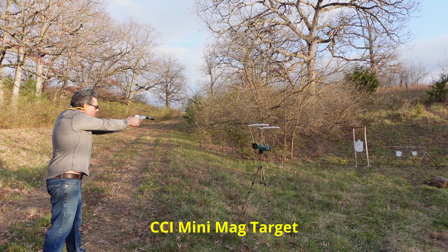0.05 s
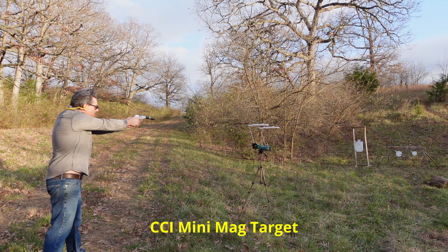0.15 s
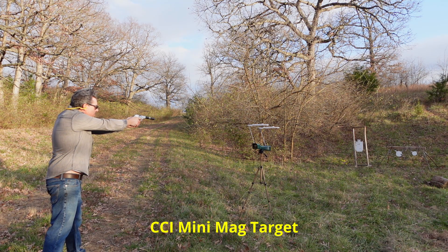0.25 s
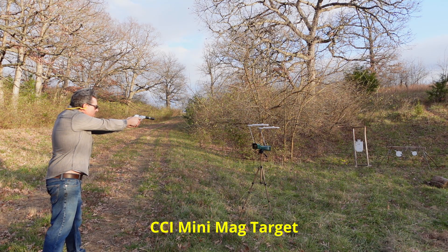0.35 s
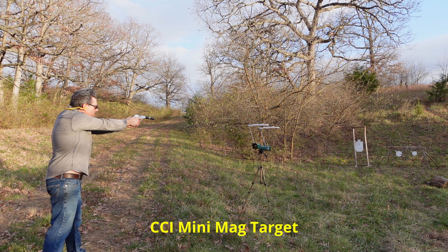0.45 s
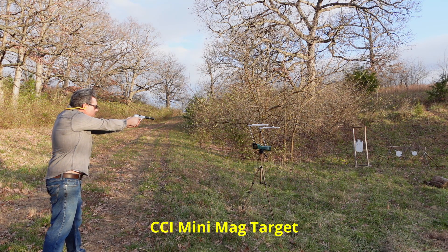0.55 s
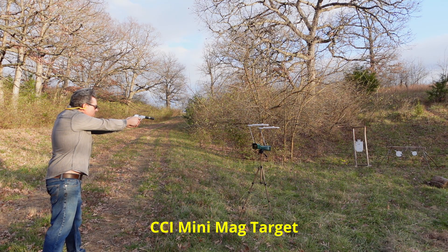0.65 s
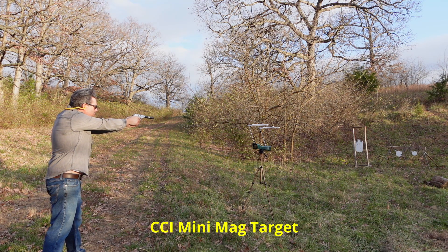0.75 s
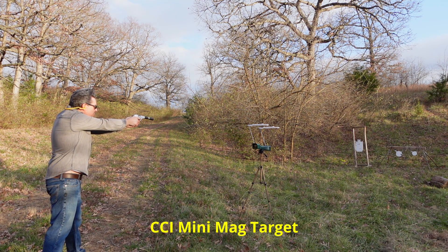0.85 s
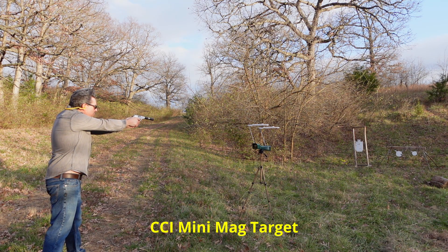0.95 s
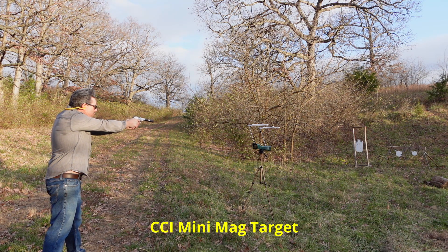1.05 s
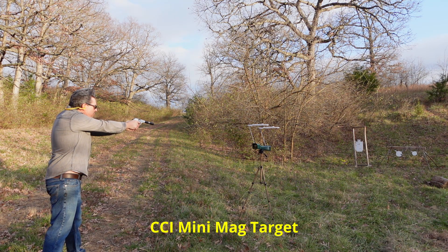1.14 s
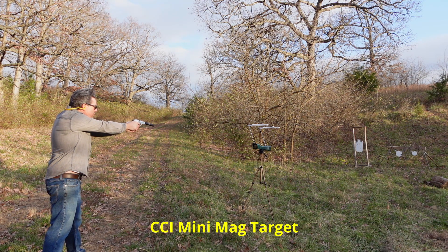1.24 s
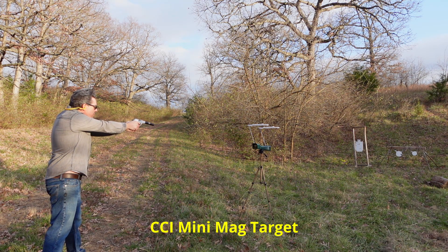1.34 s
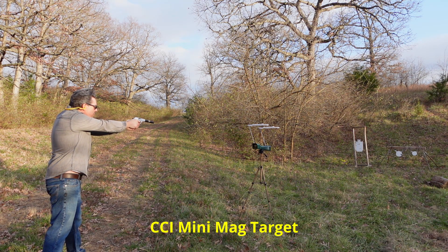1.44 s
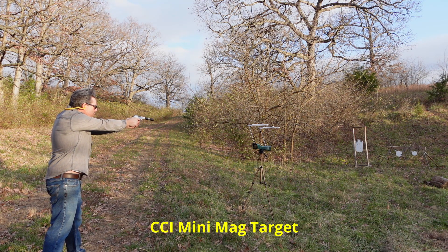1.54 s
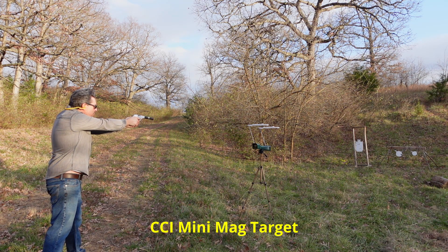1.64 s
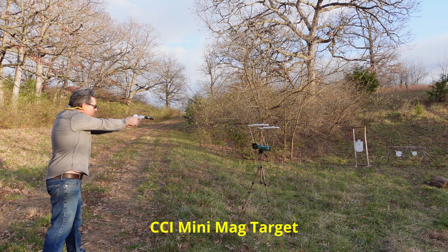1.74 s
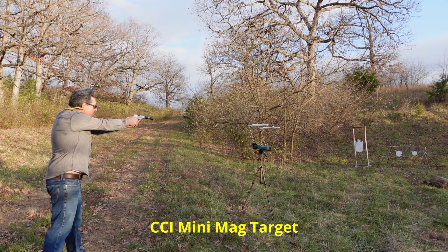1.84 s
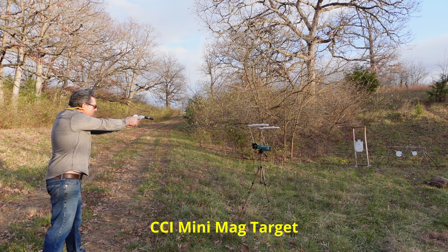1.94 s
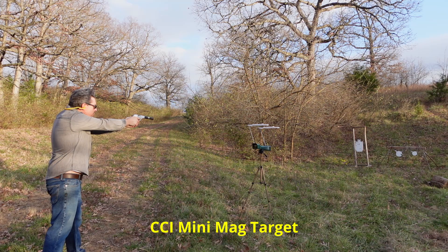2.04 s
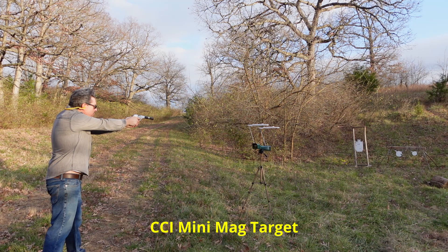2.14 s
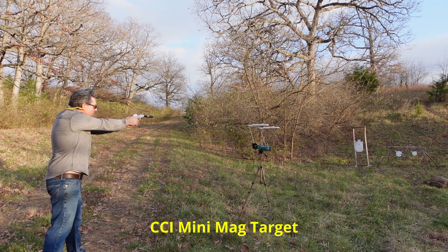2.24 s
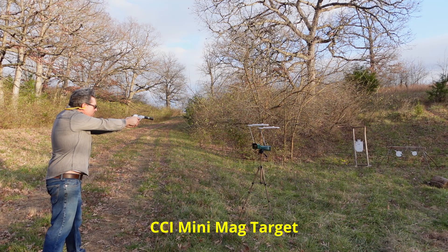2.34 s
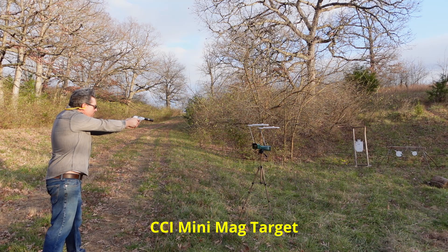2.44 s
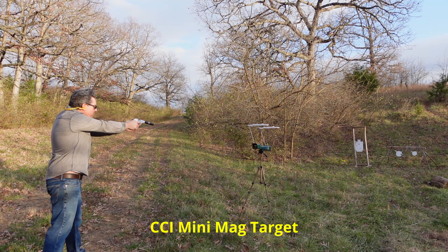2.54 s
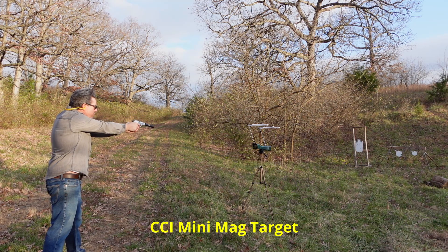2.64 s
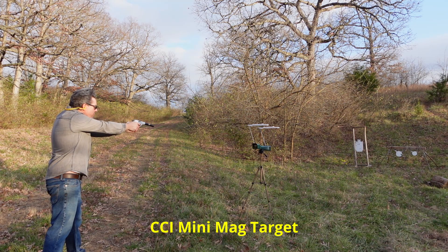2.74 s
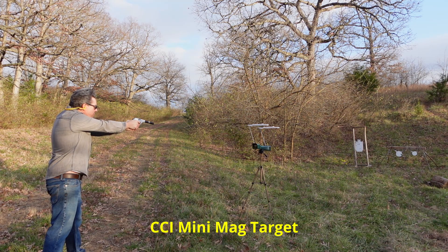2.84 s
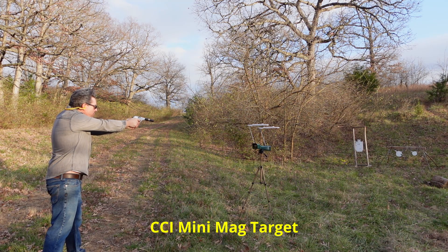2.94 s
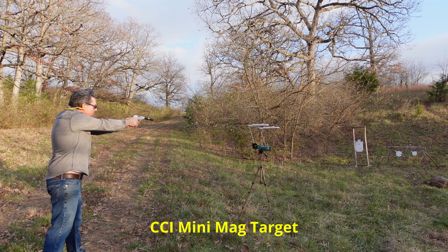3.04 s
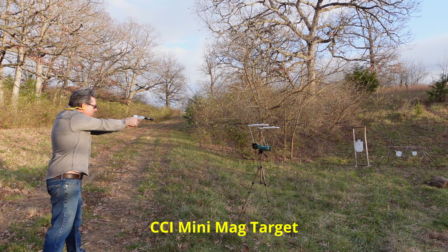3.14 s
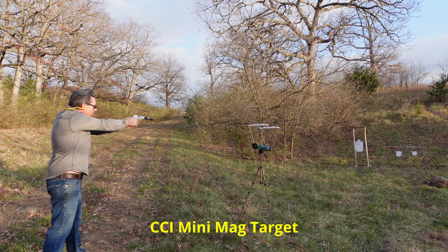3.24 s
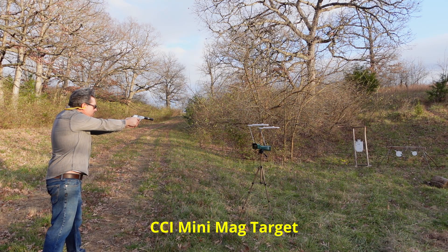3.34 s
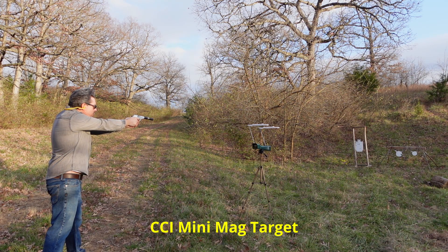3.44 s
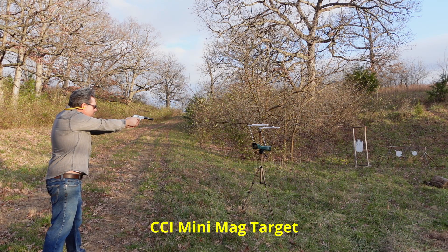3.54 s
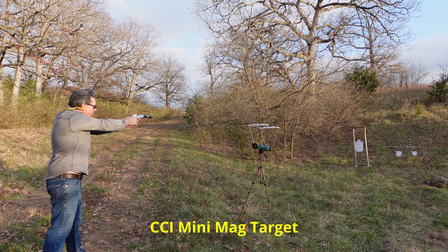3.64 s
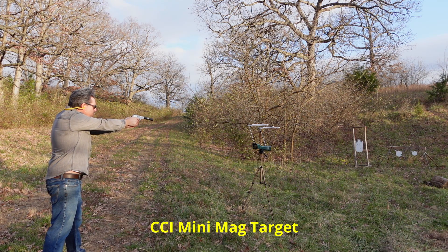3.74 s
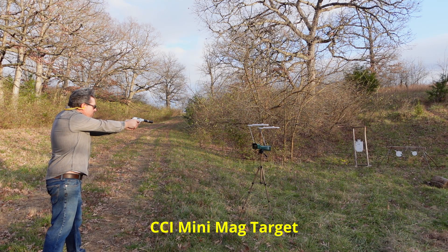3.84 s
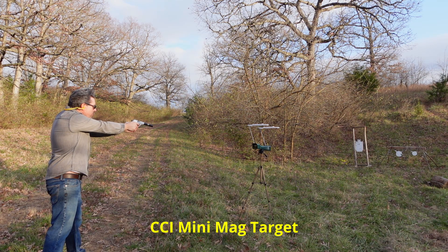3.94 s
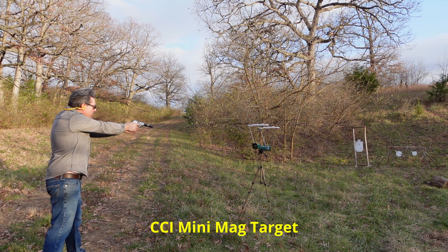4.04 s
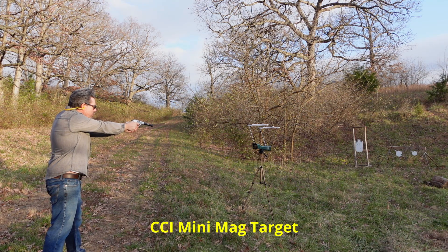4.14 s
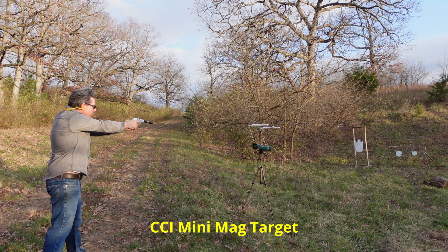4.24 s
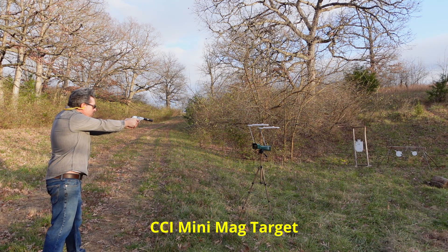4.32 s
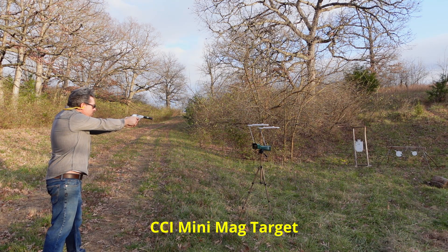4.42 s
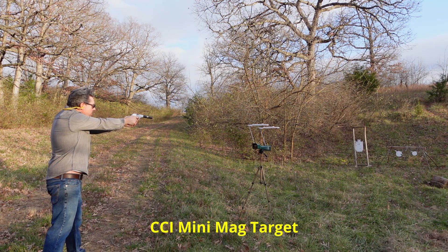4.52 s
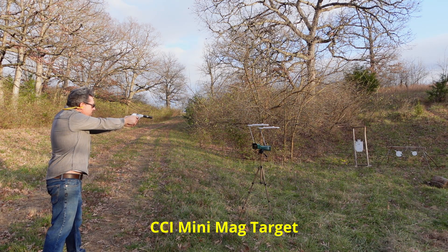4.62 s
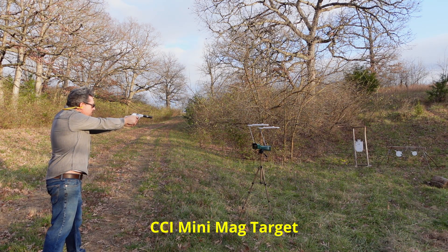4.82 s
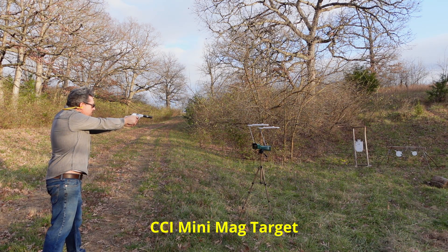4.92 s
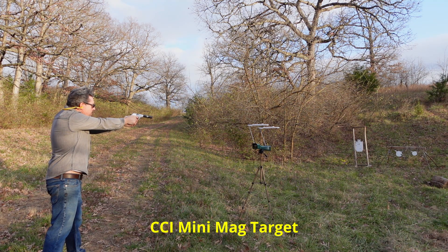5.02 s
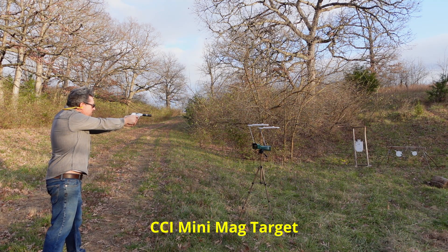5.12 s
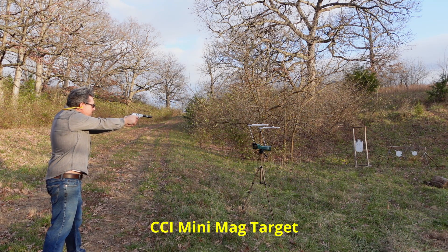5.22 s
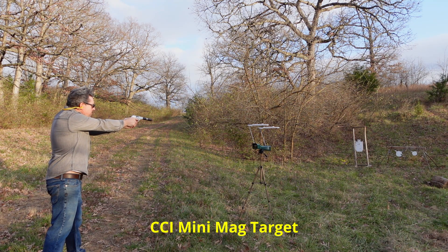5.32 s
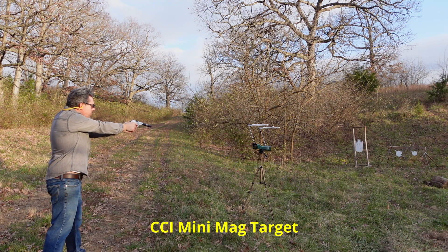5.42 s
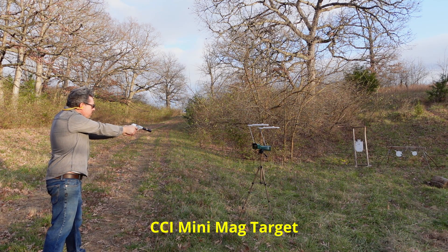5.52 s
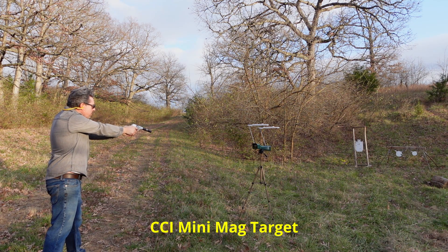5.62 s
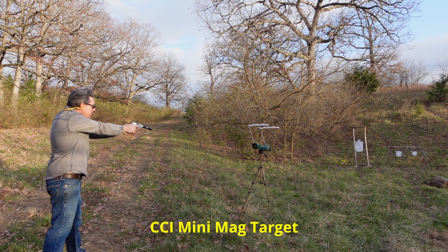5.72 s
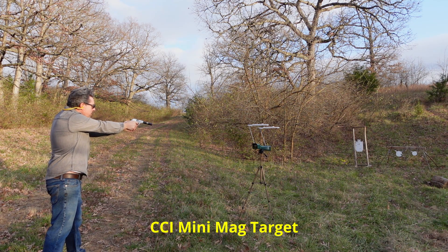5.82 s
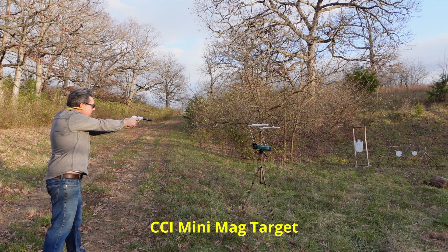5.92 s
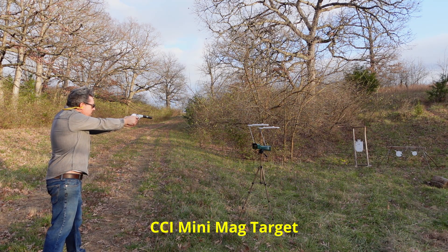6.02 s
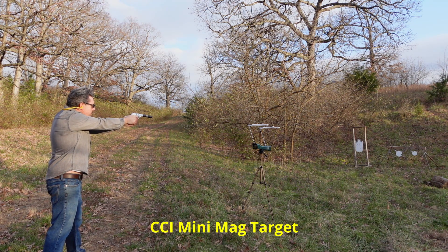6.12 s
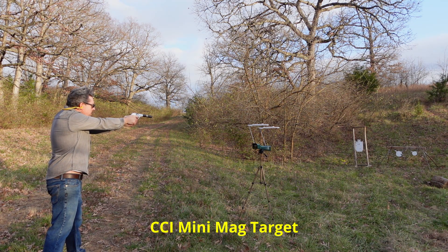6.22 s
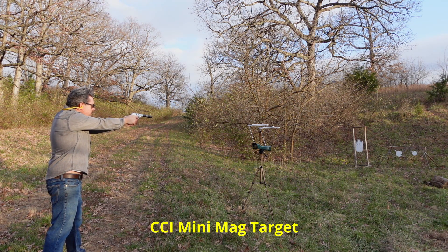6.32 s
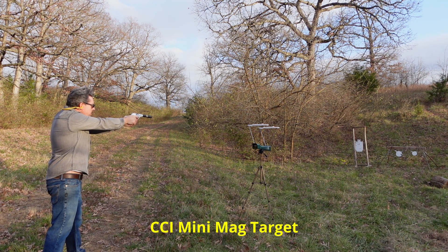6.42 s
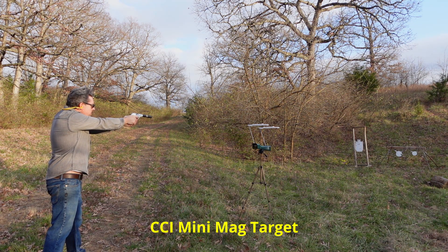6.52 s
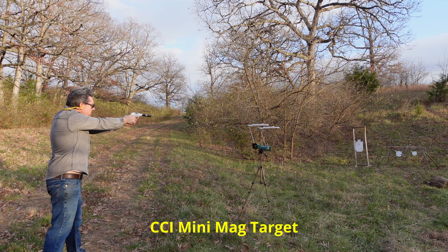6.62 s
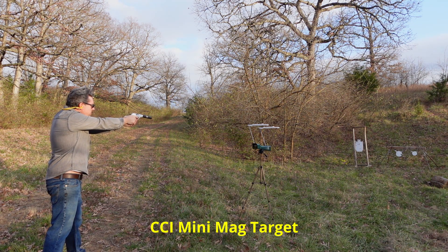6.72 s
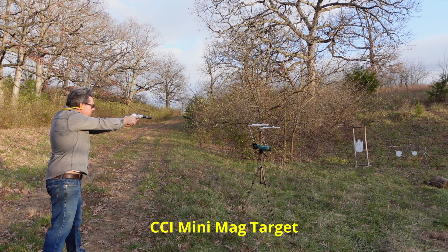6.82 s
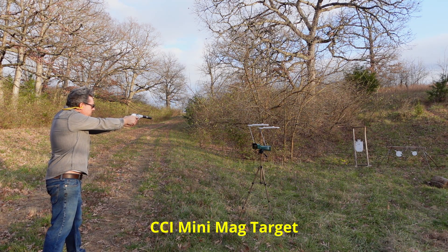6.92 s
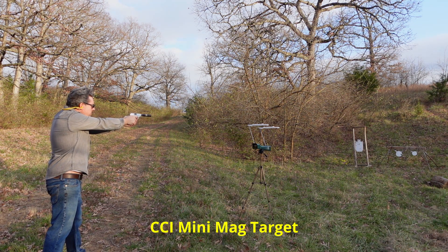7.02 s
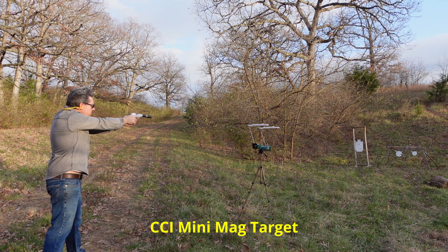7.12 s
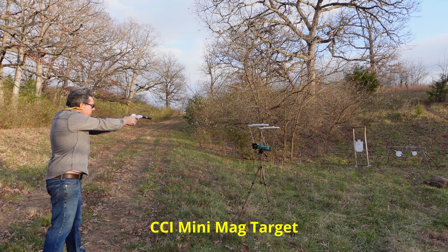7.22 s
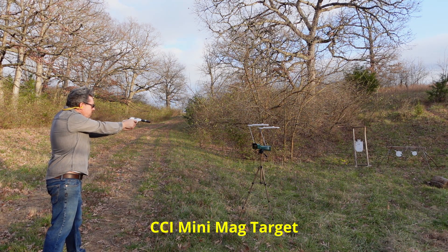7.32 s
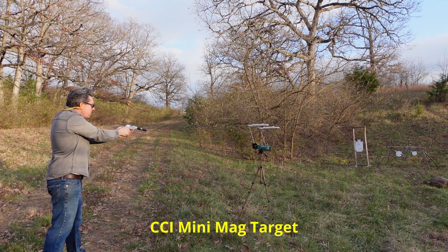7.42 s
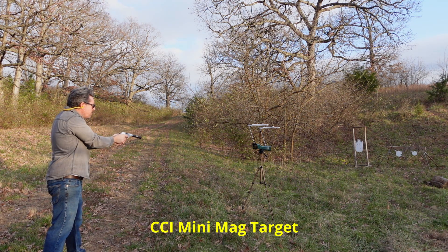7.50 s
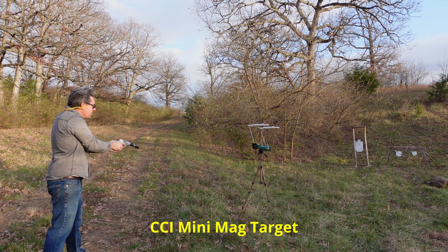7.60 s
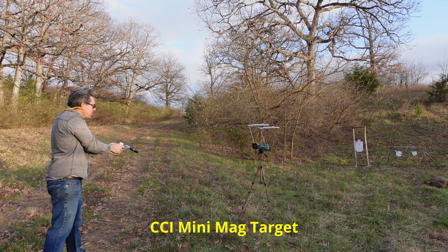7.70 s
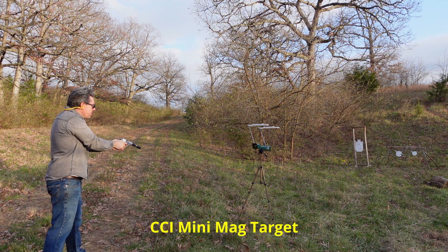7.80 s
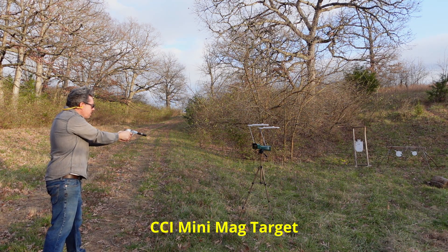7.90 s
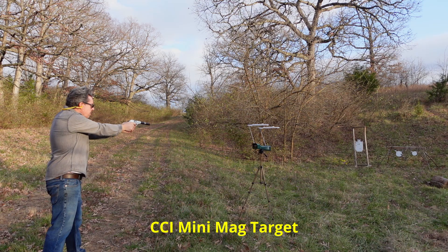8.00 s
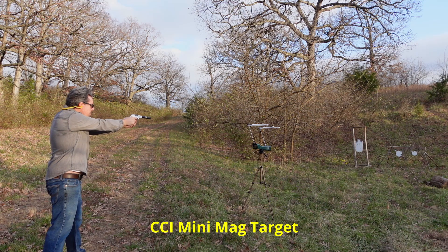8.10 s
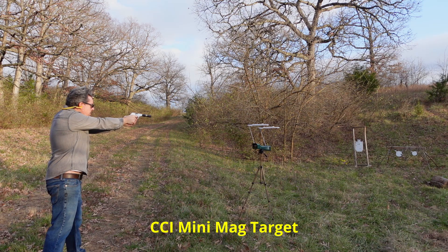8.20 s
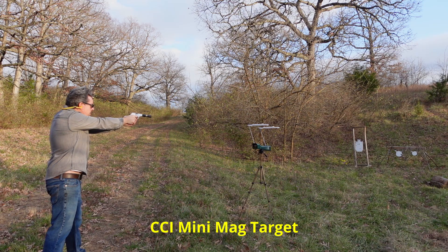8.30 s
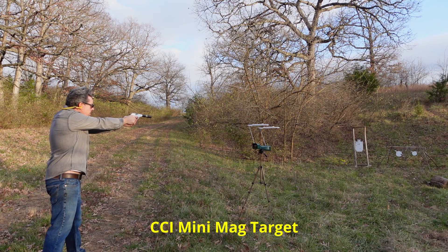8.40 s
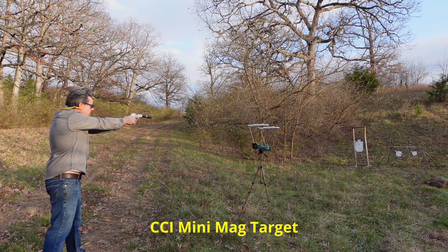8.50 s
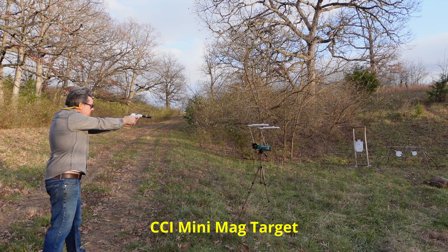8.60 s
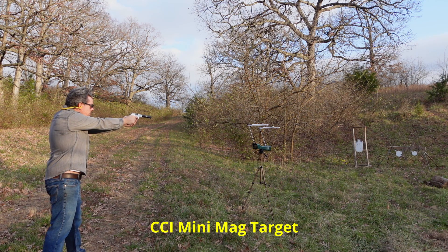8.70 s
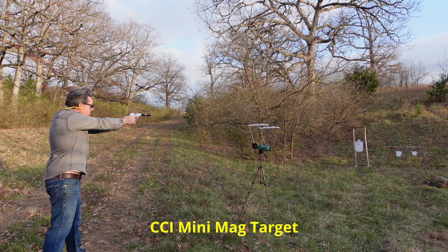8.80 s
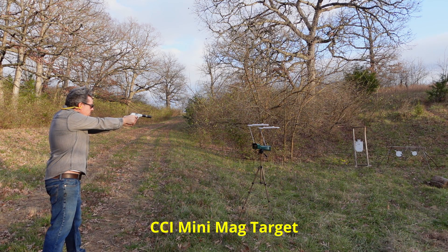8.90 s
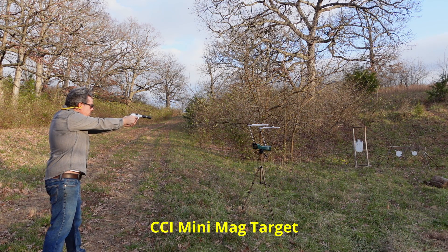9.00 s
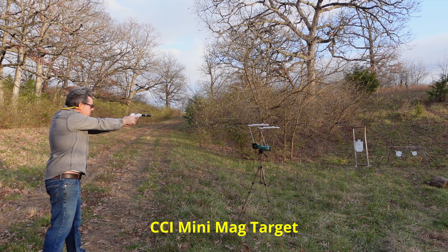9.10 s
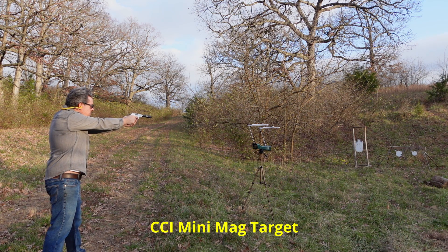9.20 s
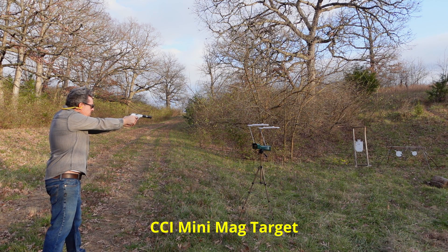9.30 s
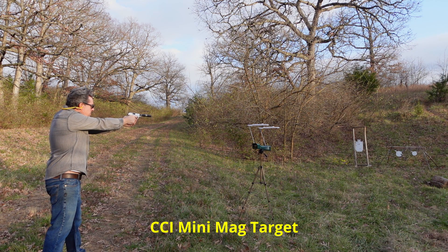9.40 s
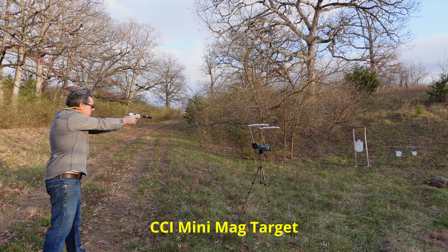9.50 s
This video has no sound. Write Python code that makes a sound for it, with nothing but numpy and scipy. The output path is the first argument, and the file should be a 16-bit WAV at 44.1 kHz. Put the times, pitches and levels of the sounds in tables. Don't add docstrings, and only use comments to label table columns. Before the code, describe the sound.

Quiet open air with distant bird whistles and low wind, then nine loud, thin pistol cracks. They come about every one and a half seconds, then a quick pair, a pause, and a fast run of three. A bullet strike clicks or knocks just after each, and brush and trunks return a short dulling echo. Between shots, tiny debris ticks, cases land in grass, and a camera motor purrs faintly. Mono, close microphone, blasts slightly rounded off.

```python
import sys
import numpy as np
from scipy import signal
from scipy.fft import rfft, irfft, next_fast_len
from scipy.io import wavfile
from scipy.ndimage import uniform_filter1d, map_coordinates

SR = 44100
rng = np.random.default_rng(int(sys.argv[2]) if len(sys.argv) > 2 else 0)


def unload_wav(signal):
    wavfile.write(
        sys.argv[1],
        SR,
        np.round(np.clip(np.atleast_2d(signal).T, -1, 1) * 32767).astype(np.int16),
    )


def boost_factor(decibels):
    exponent = np.asarray(decibels, float) / 20
    return 10 ** exponent


N = 421155
TAIL = 70000


def unit(x):
    return x / np.sqrt(np.mean(x ** 2) + 1e-20)


def along(points, hz):
    f, v = np.transpose(points)
    return np.interp(np.log(hz + 1), np.log(f + 1), v)


def wobble(rate, size=N):
    return map_coordinates(rng.standard_normal(size // 50), [np.arange(size) * rate / SR])


def filtered(x, response):
    m = next_fast_len(len(x) + 2048)
    return irfft(rfft(x, m) * response(np.fft.rfftfreq(m, 1 / SR)), m)[:len(x)]


def noise(spectrum, size=N):
    return unit(filtered(rng.standard_normal(size), lambda hz: boost_factor(along(spectrum, hz))))


def peak(hz, centre_hz, width_hz):
    return 1j * hz * width_hz / (centre_hz ** 2 - hz ** 2 + 1j * hz * width_hz)


def add(track, s, sound):
    part = track[round(s * SR):][:len(sound)]
    part += sound[:len(part)]


# breech jet in seconds, level in dB, brush echo in dB.
SHOTS = [(.7065, 3.5, 0.5), (2.252, 4, 0), (3.6452, 3.5, 1), (5.1241, 2.5, -0.5), (6.604, 3, 0),
         (7.0486, 2.5, 0.5), (8.8276, 2, 0.5), (9.1199, 2.5, -1), (9.397, 2.5, 0)]
MUZZLE_TIMES = [.70762, 2.25322, 3.64622, 5.12572, 6.60542, 7.04982, 8.82882, 9.12142, 9.39832]
# centre in Hz, width in Hz, boost in dB.
SHOT_BANDS = [
    [(1680, 220, 4.5), (2550, 220, 5.5), (4160, 110, 4), (4880, 90, 3), (2130, 110, -3), (3620, 180, -5.5),
     (6100, 230, 0.5), (9520, 130, 2.5)],
    [(2070, 730, 4), (1750, 80, 2), (2580, 130, 1.5), (3390, 200, 2.5), (3960, 320, -1), (6900, 720, -2),
     (8610, 120, -2.5)],
    [(1370, 240, 3), (3580, 300, -3), (6030, 110, 5), (7060, 130, 4), (8530, 980, -0.25)],
    [(1102, 320, -2), (2480, 150, 7.5), (3100, 380, -3), (3970, 290, 2), (4744, 480, -1.5),
     (8530, 800, 1.5)],
    [(1360, 300, -8.5), (2360, 320, -7), (3700, 800, 2), (5820, 390, 6), (7670, 800, -3.5)],
    [(2250, 220, 3), (3190, 320, -3), (4220, 200, -5.5), (5000, 130, -2.5), (6435, 240, 5.5),
     (10590, 200, -3.5)],
    [(2460, 330, -8), (3880, 800, -2.5), (6020, 130, -3), (7320, 800, 2), (9220, 200, 5)],
    [(1030, 320, -0.7), (3860, 130, 2.5), (5700, 580, 3.5), (9510, 180, -1.5), (10400, 500, -1.5)],
    [(1870, 910, -2.5), (4300, 240, -7), (6400, 200, 5), (7670, 800, 2.5), (10160, 800, 2)],
]
# centre in Hz, width in Hz, boost in dB.
SHARP_LINES = [(2620, 56, 2.5), (4780, 130, 3.5), (5030, 120, 5.5), (2490, 70, -2), (4970, 100, 1),
               (5390, 240, 5.5), (6240, 90, 4), (6260, 130, 4), (3800, 80, 1)]
BANK_ANSWERS = [0.5, 0, 1.5, -2.5, 0.5, 2, -0.5, -0.5, -3]
# time in seconds, crack in dB, crack in Hz, thud in dB, thud in Hz.
IMPACTS = [
    (.787, -15.5, 2206, -19, 830),
    (2.331, -12, 5030, -35.5, 804),
    (3.724, -20, 4500, -25, 910),
    (5.204, -6.5, 7790, -25, 500),
    (6.6896, -13.5, 2600, -7, 650),
    (7.1265, -7.5, 6500, -13, 483),
    (8.9089, -7, 3700, -34, 875),
    (9.2034, -6, 2950, -7, 840),
    (9.481, -7, 5207, -12, 1070),
]
# length of the crack in seconds, lag of the thud in seconds.
LANDINGS = [(0.00056, 0), (0.00054, 0), (.0004, 0), (.0006, 0), (.0005, 0.001), (0.00034, 0.0038),
            (0.00077, 0), (0.00032, 0.0015), (0.0011, 0.00034)]


def pistol():
    track = np.zeros(N)
    twigs, bark = rng.standard_normal((2, TAIL))
    shots = zip(SHOTS, MUZZLE_TIMES, SHOT_BANDS, SHARP_LINES, BANK_ANSWERS, IMPACTS, LANDINGS)
    for (s, db, brush_db), muzzle, broad, line, bank_db, (hit, *strike), landing in shots:
        bands = [*broad, line]
        crackle, impact = bullet(hit - s, *strike, *landing, crackle_db=brush_db - 27.5)
        answer = echoes(brush_db, twigs, bark) + trees(bank_db)
        rattle = hammer()
        add(track, s - len(rattle) / SR, rattle)
        add(track, s, boost_factor(db) * blast(muzzle - s))
        add(track, muzzle, coloured(answer, bands))
        add(track, s, coloured(crackle, bands) + impact)
    return track


def hammer():
    u = np.linspace(0, 1, round(0.0062 * SR))
    rattle = noise([(300, -2.5), (2500, 0.5), (8000, -6.5), (10500, -29.5)], size=len(u))
    return boost_factor(-61 + 14.5 * u) * rattle


# delay in seconds, peak in dB, time to fall 60 dB in seconds.
ARRIVALS = [
    (0, -6.5, 0.016),
    (.0029, -10.5, .015),
    (.0088, -15.5, .05),
]
# frequency in Hz, level in dB per Hz.
BLAST_COLOUR = [(300, -39.5), (800, -4), (3000, -4), (5000, -1.5), (8300, -5), (11000, -14.5),
                (13500, -5.5), (16000, -17.5)]


def blast(lead):
    t = np.arange(4096) / SR
    after = np.clip(t - lead, 0, None)
    jet = noise([(1500, -25), (5000, 0), (12000, -4), (16000, -12)], size=4096)
    jet *= boost_factor(-17 - 60 * t / .008)
    shape = sum(boost_factor(db - 60 * (t - lead - s) / t60) * (t > lead + s) for s, db, t60 in ARRIVALS)
    shape *= 1 - np.exp(-after / .0004)
    shape *= 1 - .55 / (1 + np.exp((.0022 - after) / .0002))
    bore_hz, bore_s = 8460, 0.00075
    bore = boost_factor(-12.5) * np.exp(-((t - lead - bore_s) / bore_s) ** 2) * np.sin(2 * np.pi * bore_hz * t)
    sweep_hz = (2300 + 2.8e6 * after) * (after > 0)
    whistle = np.sin(2 * np.pi * np.cumsum(sweep_hz) / SR + 2.8)
    whistle *= 0.062 * (after > 0) * (after < .0021)
    return jet + shape * noise(BLAST_COLOUR, size=4096) + whistle + bore + pulses(lead)


# delay in seconds, level in dB, length in seconds, dull above this many Hz.
PULSE_PATHS = [(-.0003, -13, .0003, 1500), (.0006, -4, .0006, 1500), (.001, -12, .0003, 2500),
               (.0027, -11, .0004, 1800), (.0038, -8, .0006, 1500), (.0059, -14, .0005, 1500)]


def pulses(lead):
    t, total = np.arange(4096) / SR, 0
    for delay, db, length, dull_hz in PULSE_PATHS:
        arrival = lead + delay + rng.normal(0, .00004)
        u = np.clip(t - arrival, 0, None) / length
        step = -boost_factor(db + rng.normal(0, 1.2)) * (1 - u) * np.exp(-u) * (u > 0)
        total = total + filtered(step, lambda f: 1 / (1 + 1j * f / dull_hz) ** 2)
    return filtered(total, lambda f: (1j * f / (135 + 1j * f)) ** 2)


# frequency in Hz, level in dB per Hz.
FLIGHT_COLOUR = [(120, -49.5), (200, -9.5), (683, -0.5), (1450, -9), (1870, -1), (2800, -9), (4200, -4.5),
                 (8580, -3.5), (16000, -15.5)]


def bullet(flight, crack_db, crack_hz, thud_db, thud_hz, length, lag, crackle_db):
    t = np.arange(8192) / SR
    after = np.clip(t - flight, 0, None)
    swell = 3 * (t / flight) ** 3 + 1.4 * wobble(300, size=8192) - 60 * after / .03
    hiss = noise(FLIGHT_COLOUR, size=8192)
    top = filtered(hiss, lambda f: 1 / (1 + (9500 / (f + 1)) ** 8))
    crackle = boost_factor(crackle_db + swell) * (t > .004) * (hiss - top + top * boost_factor(1.0 - 50.5 * t))

    def crack_colour(f):
        return (0.95 + peak(f, crack_hz, .5 * crack_hz)) / (1 + (f * length / 5.5) ** 6)

    snap = unit(filtered(noise(FLIGHT_COLOUR, size=8192), crack_colour))
    ping = 0.49 * np.sqrt(2) * np.sin(2 * np.pi * crack_hz * (t - flight))
    crack = boost_factor(crack_db) * np.exp(-((t - flight) / length) ** 2) * (0.7 * snap + ping)
    turns = np.clip(after - lag, 0, None) * thud_hz
    shape = np.exp(-((turns - .8) / 0.66) ** 2) + 0.13 * boost_factor(-60 * after / 0.06)
    thud = -boost_factor(thud_db) * np.sin(2 * np.pi * turns) * shape
    return crackle, crack + filtered(thud, lambda f: 1 / (1 + (200 / (f + 1)) ** 4))


# level in dB, spread in seconds, dull above this many Hz.
TRUNKS = [(-21.5, 0.0029, 16000), (-23.5, 0.003, 4500), (-22.5, 0.0045, 3600), (-33.5, 0.0018, 3800),
          (-37.5, 0.0031, 740), (-28.5, 0.007, 1500), (-30.5, 0.0091, 1700), (-37, 0.0057, 620),
          (-39, 0.014, 1180), (-42.5, 0.013, 1930), (-48, .026, 1400), (-49, 0.0081, 900),
          (-46.5, 0.022, 1700), (-51.5, 0.031, 2300), (-51.5, 0.014, 2100), (-50.5, 0.0044, 2100),
          (-56.5, 0.028, 1840), (-58, 0.0056, 1300), (-34.5, 0.007, 300), (-55.5, 0.0071, 5500),
          (-52, .014, 5000), (-36, .012, 1400)]
TRUNK_DELAYS = [.0315, .0625, .072, .12, .133, .162, .175, .223, .344, .36, .415, .4945, .526, .56, .6,
                .709, .769, .889, .074, .594, .407, .095]
# frequency in Hz, level in dB.
TRUNK_COLOUR = [(60, -33.5), (200, -13.5), (500, 6), (1200, 0.5), (4000, 10), (16000, -1.5)]
# frequency in Hz, level in dB per Hz.
TWIG_COLOUR = [(47, -41), (80, -9), (265, -10), (643, -2), (1140, -3), (2490, -5), (3030, -9), (3960, -5.5),
               (8410, -6), (13700, -16), (16000, -27.5)]
# frequency in Hz, loss in dB per second of travel.
AIR_LOSS = [(100, -0.5), (1000, -1), (4000, 11), (8000, 34), (12000, 69.5), (16000, 98)]


def echoes(brush_db, twigs, bark):
    t = np.arange(TAIL) / SR
    hz, s, z = signal.stft(scatter(TWIG_COLOUR, twigs), SR, nperseg=256)
    leaves = np.resize(bark, z.shape) + .5 * rng.standard_normal(z.shape)
    clumps = uniform_filter1d(uniform_filter1d(leaves, size=4, axis=0), size=7, axis=1)
    gain_db = 2.0 * unit(clumps) - along(AIR_LOSS, hz)[:, None] * s
    tail = signal.istft(z * boost_factor(gain_db), SR, nperseg=256)[1][:TAIL]
    tail *= brush(t) * boost_factor(brush_db + 0.32 * wobble(57, size=TAIL))
    surface = scatter(TRUNK_COLOUR, bark)
    for delay, (db, spread, dull_hz) in zip(TRUNK_DELAYS, TRUNKS):
        first = max(round((delay - 4 * spread) * SR) - 200, 0)
        last = round((delay + 4 * spread) * SR) + 200
        copy = unit(filtered(surface[first:last], lambda f: 1 / (1 + (f / dull_hz) ** 3)))
        u = (t[first:last] - delay) / spread
        shape = np.exp(-np.where(u < 0, 2.5 * u, u) ** 2)
        tail[first:last] += boost_factor(db + rng.normal(0, 1.2)) * shape * copy
    return tail


def brush(t):
    def edge(s):
        return 1 / (1 + np.exp(np.clip((s - t) / 0.027, -50, 50)))

    near_s, far_s, wood_ends_s = 0.032, 0.18, 0.84
    grass = boost_factor(-26 - 60 * t / 0.11)
    belt = boost_factor(-28) * edge(near_s) * (1 - edge(far_s))
    wood = boost_factor(-33 - 27 * t - 22.5 * np.clip(t - wood_ends_s, 0, None)) * edge(near_s)
    return np.sqrt(grass ** 2 + belt ** 2 + wood ** 2)


# frequency in Hz, share from 0 to 1.
ALIKE = [(300, .93), (800, .9), (1500, .74), (3000, .5), (6000, .22), (12000, .05)]


def scatter(spectrum, land):
    hz = np.fft.rfftfreq(TAIL, 1 / SR)
    share = along(ALIKE, hz)
    stirred = rfft(rng.standard_normal(TAIL))
    mix = np.sqrt(share) * rfft(land) + np.sqrt(1 - share) * stirred
    return unit(irfft(mix * boost_factor(along(spectrum, hz)), TAIL))


# delay in seconds, peak in dB, pitch in Hz.
HARD_SURFACES = [(0.0611, -17, 2300), (0.0623, -13, 2300), (0.063, -19, 1600), (0.064, -13, 1100),
                 (0.0646, -16, 2300), (0.0713, -16, 2300), (0.1205, -27, 1600), (0.1342, -26, 1600),
                 (0.163, -20, 1100), (0.1654, -24, 1600), (0.2189, -34, 1100), (0.224, -35, 750),
                 (0.226, -37, 750), (0.2296, -35, 2300), (0.2511, -38, 2300), (0.276, -36, 2300),
                 (0.2862, -39, 1600), (0.3007, -39, 1100), (0.304, -38, 1600), (0.3071, -38, 2300),
                 (0.3421, -34, 750), (0.3472, -35, 1600), (0.3555, -34, 750), (0.3606, -36, 1100),
                 (0.4061, -38, 2300), (0.4203, -38, 2300), (0.4226, -42, 1100), (0.425, -41, 1600),
                 (0.4453, -41, 1600), (0.4616, -45, 1600), (0.4677, -47, 500), (0.4943, -41, 1100),
                 (0.5226, -41, 1600), (0.5249, -38, 1600), (0.5298, -42, 1100), (0.546, -43, 1600),
                 (0.5888, -44, 1600), (0.5987, -43, 2300), (0.6041, -42, 1100), (0.6175, -47, 1100),
                 (0.6283, -48, 1600), (0.6464, -50, 1100), (0.6822, -54, 1100), (0.6945, -51, 1100),
                 (0.7087, -46, 1100), (0.7519, -51, 1600), (0.759, -51, 1600), (0.766, -50, 1100),
                 (0.7689, -51, 1100), (0.7707, -52, 1100), (0.7748, -50, 1100), (0.7945, -51, 1600),
                 (0.8085, -52, 1600), (0.8114, -51, 750), (0.8488, -54, 1600), (0.8866, -48, 1600),
                 (0.8888, -46, 1600), (0.8908, -49, 2300)]


def trees(bank_db):
    track, t = np.zeros(TAIL), np.arange(-128, 128) / SR
    for delay, db, hz in HARD_SURFACES:
        u = np.pi * hz * t
        near_bank_db = bank_db * (delay < .07)
        level = boost_factor(db - 1 + near_bank_db + 1.5 * rng.standard_normal())
        add(track, delay + t[0], level * np.sqrt(2 * np.e) * u * np.exp(-u ** 2))
    return track


# frequency in Hz, boost in dB.
SHARED_COLOUR = [(700, -2), (1100, 0), (1900, -2.5), (3700, 2), (8900, 1), (10200, -2.5), (12000, 2),
                 (15600, 2.5)]


def coloured(x, bands):
    knots = rng.standard_normal(100)

    def response(f):
        ripple_db = 0.4 * map_coordinates(knots, [f / 260])
        bands_db = sum(db * np.exp(-((f - hz) / width) ** 2) for hz, width, db in bands)
        return boost_factor(ripple_db + along(SHARED_COLOUR, f) + bands_db)

    return filtered(x, response)


# time in seconds, peak in dB, dull part in dB, length in seconds.
CASES = [(1.546, -38.5, -2.5, 0.018), (1.5526, -25, -10, 0.019), (1.594, -49.5, 2, 0.012),
         (3.02, -36, -18, 0.018), (4.431, -44.5, -12, 0.018), (4.447, -38, -8, 0.019),
         (4.464, -36, -5.5, 0.013), (5.994, -40.5, -21, 0.017), (6.01, -30.5, -4, 0.0047),
         (7.396, -32, -2, 0.015), (7.8155, -42.5, -10, 0.021), (7.985, -53, -9, 0.016),
         (8.117, -57, -4, 0.016)]
# frequency in Hz, level in dB per Hz.
GRASS_COLOUR = [(290, -28), (500, 6.5), (1600, 3.5), (2290, 1), (3020, -5), (6140, -6.5), (11000, -13),
                (16000, -17.5)]
# time in seconds, peak in dB, pitch in Hz.
TICKS = [(0.5191, -46, 4000), (1.9142, -57, 3320), (2.8466, -45, 8000), (2.9513, -46.5, 7800),
         (2.9952, -44, 8000), (3.0992, -44, 3000), (3.1202, -44, 6000), (3.1621, -40.5, 6750),
         (3.192, -42, 4500), (3.208, -40, 4200), (3.2318, -38, 3600), (3.26, -47, 4000),
         (3.2786, -47, 7530), (3.35, -45, 5500), (3.36, -44, 5980), (3.385, -48, 8500), (3.4067, -42, 3200),
         (3.4379, -37.5, 5000), (3.449, -50, 7520), (3.499, -49, 8000), (3.5394, -45, 8000),
         (3.615, -51, 4020), (4.0321, -46, 9000), (4.3988, -49, 3300), (4.9554, -46, 2700),
         (5.8323, -41, 5000), (5.8697, -39, 4500), (5.8924, -43, 8520), (5.955, -42, 8500),
         (6.0598, -35, 8040), (6.101, -36, 2800), (6.132, -39, 4400), (6.1552, -41, 5500),
         (6.187, -42, 4200), (6.207, -39, 5530), (6.2266, -36.5, 8100), (6.2967, -39, 3800),
         (6.3321, -31.5, 5700), (6.358, -46, 4000), (6.397, -38, 3100), (6.465, -56.5, 7000),
         (6.4973, -47, 3100), (6.5247, -52.5, 5000), (6.548, -46, 2990), (6.584, -49, 8000),
         (7.9394, -53.5, 2680), (8.4344, -60, 3300)]
# time in seconds, level in dB, pitch in Hz.
CLODS = [
    (2.611, -47, 188),
    (3.47, -63, 415),
]
# frequency in Hz, level in dB per Hz.
PATTER_COLOUR = [(500, -19), (1500, 1), (4000, 1), (8500, -1.5), (9500, -10), (15000, -12.5), (16500, -13)]


def debris():
    track, t = np.zeros(N), np.arange(4096) / SR
    for s, db, dull_db, length in CASES:
        settling = boost_factor(-9.5 - 60 * t / 0.38) * (1 - t / t[-1])
        shape = np.clip(t / 0.001, 0, 1) * (boost_factor(-14 * (t / length) ** 3) + settling)
        stalks = noise(GRASS_COLOUR, size=4096)
        crunch = unit(filtered(stalks, lambda f: 1 + (boost_factor(dull_db - 6.0) - 1) / (1 + (f / 3200) ** 4)))
        add(track, s, boost_factor(db - 15.0 + 3.3 * wobble(406, size=4096)) * shape * crunch)
    short = t[:1024]
    for s, db, hz in TICKS:
        def tick_colour(f):
            return peak(f, hz, .25 * hz) ** 2 + 0.6 * boost_factor(along(PATTER_COLOUR, f))

        snap = unit(filtered(rng.standard_normal(1024), tick_colour))
        add(track, s, boost_factor(db - 15 - 60 * short / .026) * np.clip(short / .001, 0, 1) * snap)
    for s, db, hz in CLODS:
        add(track, s, boost_factor(db) * np.hanning(2048) * np.sin(2 * np.pi * hz * t[:2048]))
    when, size = rng.random((16000, 2)).T
    grains = np.bincount((when * N).astype(int), boost_factor(-4 * np.log(size + .002)), N)
    flicks = signal.fftconvolve(grains, boost_factor(-60 * t[:512] / .012))[:N]
    return track + showers() * unit(flicks * noise(PATTER_COLOUR))


# time when densest in seconds, level in dB.
SHOWERS = [(2.8, -65), (4.2, -80), (5.7, -64), (6.4, -71), (7.5, -80.5)]


def showers():
    t = np.arange(N) / SR
    level = boost_factor(-90.5)
    for s, db in SHOWERS:
        rise = np.exp(-(np.clip(s - t, 0, None) / .2) ** 2)
        level = level + boost_factor(db - 11.5 * np.clip(t - s, 0, None)) * rise
    return level


# start in seconds, top pitch in Hz, level in dB.
TRILL = [(4.487, 7750, -65), (4.578, 7460, -66), (4.688, 7670, -63.5), (4.782, 7600, -63.5),
         (4.89, 7780, -65.5), (4.997, 7840, -66)]
# start in seconds, length in seconds, top pitch in Hz, depth in Hz, level in dB.
CHIRPS = [
    (.44, 0.06, 7400, 502, -76.5),
    (1.928, .046, 6500, 1215, -63),
    (2.133, 0.083, 8800, 1582, -70.5),
    (7.722, 0.018, 6090, 200, -59.5),
]


def birds():
    track = np.zeros(N)
    # start, rise s, fall s, top Hz, climb Hz, drop Hz, dB
    notes = [(s, 0.043, .011, hz, 1400, 2800, db) for s, hz, db in TRILL]
    notes += [(s, length / 2, length / 2, hz, depth, depth, db) for s, length, hz, depth, db in CHIRPS]
    for s, rise, fall, top_hz, climb_hz, drop_hz, db in notes:
        t = np.arange(round((rise + fall) * SR)) / SR
        up = climb_hz * np.clip(1 - t / rise, 0, 1) ** 2
        down = drop_hz * np.clip((t - rise) / fall, 0, 1) ** 2
        shape = np.sin(np.pi * t / (rise + fall)) ** .25
        add(track, s, boost_factor(db) * shape * np.sin(2 * np.pi * np.cumsum(top_hz - up - down) / SR))
    return track + boost_factor(-6.0) * in_wood(track, t60=.6)


def in_wood(track, t60):
    wood = boost_factor(-60 * np.arange(SR // 2) / SR / t60) * rng.standard_normal(SR // 2)
    return signal.fftconvolve(track, wood / np.linalg.norm(wood))[:len(track)]


# start in seconds, end in seconds, first pitch in Hz, last pitch in Hz, level in dB.
WHISTLES = [(-.1, .14, 3620, 3330, -79), (.07, .3, 3160, 3030, -82), (.25, .45, 3030, 3250, -83.5),
            (0.404, .6, 3610, 3570, -81), (.5, 0.718, 3550, 3420, -80.5), (.56, .72, 3350, 3230, -82.5),
            (1.69, 1.899, 4600, 4104, -81), (1.704, 1.922, 3650, 3240, -76.5),
            (1.851, 2.12, 3630, 3610, -80.5), (1.958, 2.139, 3160, 3300, -79.5),
            (2.0, 2.14, 3400, 3280, -80), (3.299, 3.64, 3400, 3190, -83), (4.745, 4.95, 3600, 3580, -81.5),
            (4.83, 5.02, 3520, 3480, -82), (4.971, 5.13, 3420, 3280, -81.5), (6.059, 6.18, 3470, 3330, -72),
            (6.4, 6.599, 3350, 3200, -84.5), (7.929, 8.072, 3536, 3520, -76),
            (8.101, 8.452, 3500, 3286, -80), (8.46, 8.6, 3230, 3050, -78), (8.579, 8.83, 3210, 3056, -84),
            (8.3, 8.62, 1700, 1622, -88), (8.55, 8.828, 1680, 1600, -91)]


def chorus():
    track = np.zeros(N + SR)
    for start, end, from_hz, to_hz, db in WHISTLES:
        u = np.linspace(0, 1, round((end - start) * SR))
        blur = unit(filtered(rng.standard_normal(len(u)), lambda f: 1 / (1 + (f / 110) ** 2)))
        tone = np.sin(2 * np.pi * np.cumsum(from_hz + (to_hz - from_hz) * u) / SR)
        shape = np.sin(np.pi * u ** .5) ** .4
        add(track, start + 1, boost_factor(db + 5) * shape * (.8 + .4 * blur) * tone)
    return (0.72 * track + 0.85 * in_wood(track, t60=.7))[SR:]


# start in seconds, end in seconds, level in dB.
FOCUS_RUNS = [
    (1.63, 2.25, -57.5),
    (6.105, 6.6, -57.5),
    (8.411, 8.82, -67.5),
]
# centre in Hz, width in Hz, level in dB.
HOUSING = [(72, 40, 1), (180, 60, -1.5), (252, 22, 4.5), (297, 45, -3.5), (440, 80, -13.5)]


def focus_motor():
    steps = np.zeros(N)
    for start, end, db in FOCUS_RUNS:
        times = np.arange(start, end, 1 / 30)
        jitter, size = rng.standard_normal((len(times), 2)).T
        to_and_fro = (-1) ** np.arange(len(times))
        steps[((times + .0005 * jitter) * SR).astype(int)] = boost_factor(db + 1.1 * size) * to_and_fro
    rub = signal.fftconvolve(steps, np.hanning(600))[:N] * (0.032 * rng.standard_normal(N))

    def body(f):
        return sum((-1) ** k * boost_factor(db) * peak(f, c, w) for k, (c, w, db) in enumerate(HOUSING))

    return boost_factor(51.0) * filtered(rub + steps, body)


# time in seconds, level in dB.
WIND = [(0.0, -63), (0.53, -55.5), (1.06, -68), (1.36, -52.5), (2.61, -61.5), (2.77, -51.5), (3.08, -56.5),
        (3.54, -56.5), (3.69, -67), (4.36, -65), (4.87, -58), (5.24, -64.5), (5.61, -57.5), (6.94, -70.5),
        (7.45, -66), (7.66, -60.5), (9.23, -72.5), (9.55, -70)]
# frequency in Hz, level in dB per Hz.
BUFFET_COLOUR = [(5, -7), (15, 5.5), (30, -12.5), (60, -22), (120, -68)]
# frequency in Hz, level in dB per Hz.
DISTANCE_COLOUR = [(26, -32), (45, -5.5), (110, -9.5), (159, -19), (280, -19), (350, -18.5), (649, -22),
                   (810, -28), (2520, -34), (3080, -32.5), (4450, -38), (15700, -50), (16500, -50)]


def air():
    far = boost_factor(-62 + 0.27 * wobble(17)) * noise(DISTANCE_COLOUR)
    s, db = np.transpose(WIND)
    gusts_db = np.interp(np.arange(N) / SR, s, db) + 6.0
    return far + boost_factor(gusts_db + 1.5 * wobble(8.3)) * noise(BUFFET_COLOUR)


def scene():
    return (pistol() + debris() + birds() + chorus() + focus_motor() + air())[None]


def top_cut(x):
    return signal.sosfilt(signal.butter(12, 17060, fs=SR, output="sos"), x)


def record(dry):
    heard = filtered(dry[0], lambda hz: .004 + (1 - np.tanh((hz - 15800) / 45)) / 2)
    held = heard / (1 + np.abs(heard / .74) ** 6) ** (1 / 6)
    mix = filtered(held, lambda hz: 1 / (1 + (hz / 16700) ** 60))
    return top_cut(mix[None])


dry = scene()
out = record(dry)
unload_wav(out)
```